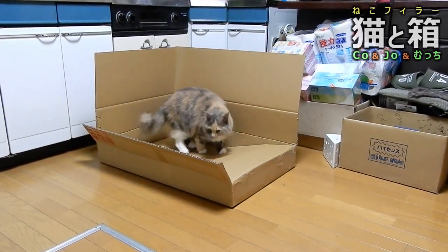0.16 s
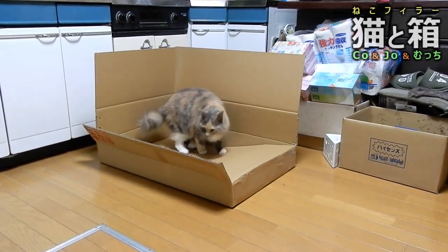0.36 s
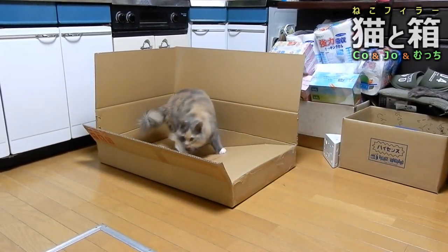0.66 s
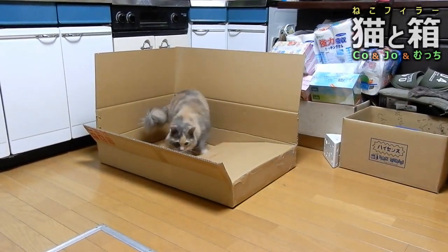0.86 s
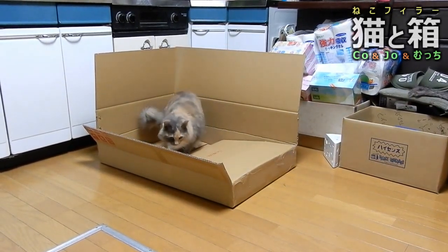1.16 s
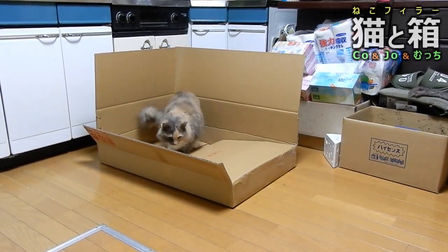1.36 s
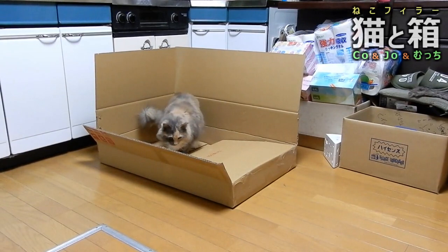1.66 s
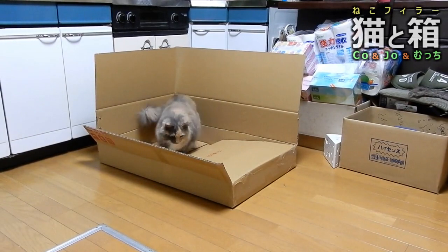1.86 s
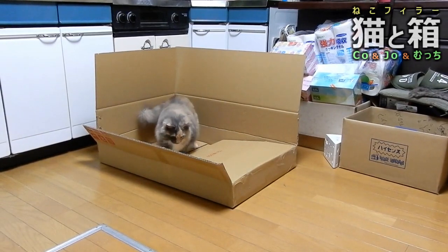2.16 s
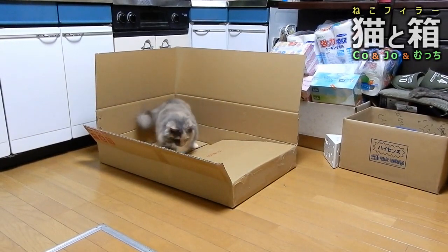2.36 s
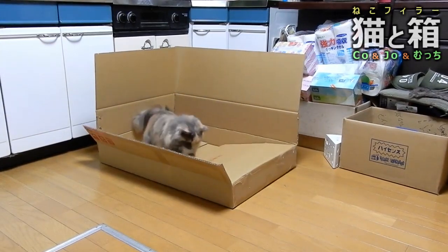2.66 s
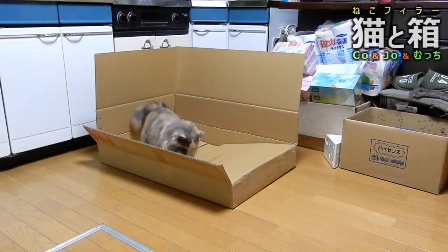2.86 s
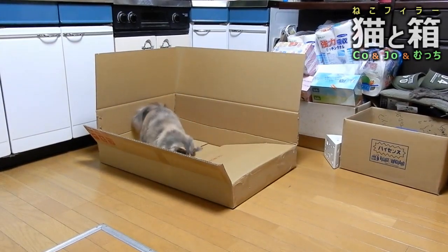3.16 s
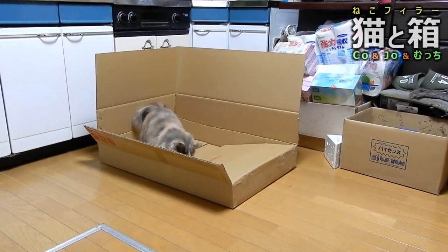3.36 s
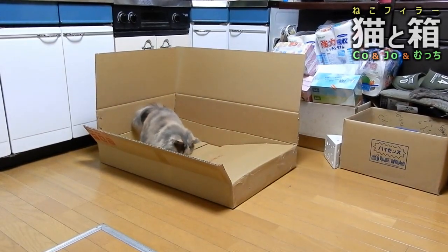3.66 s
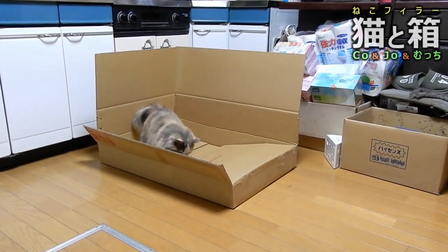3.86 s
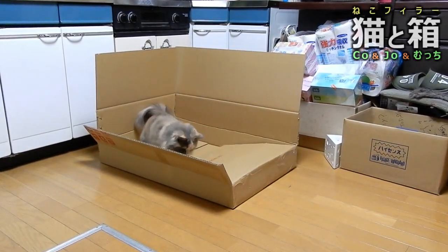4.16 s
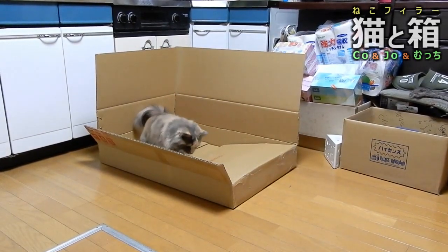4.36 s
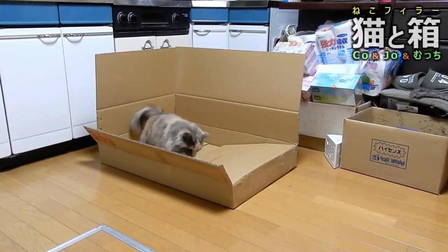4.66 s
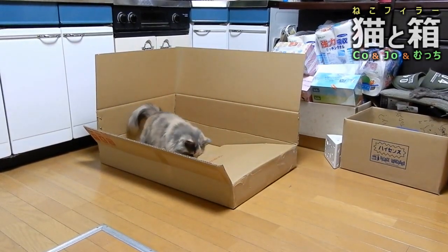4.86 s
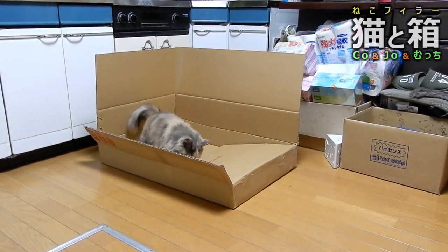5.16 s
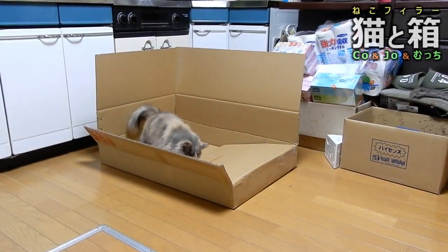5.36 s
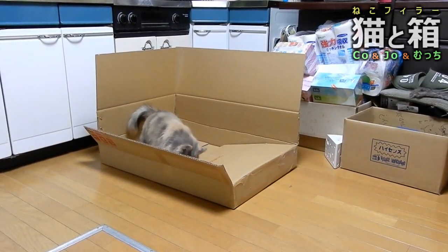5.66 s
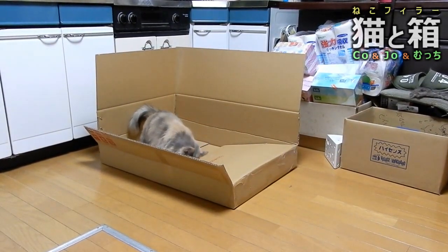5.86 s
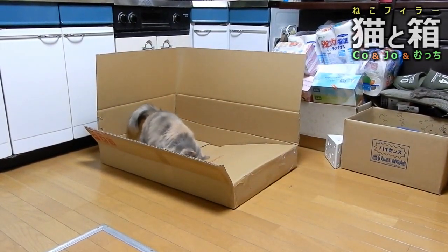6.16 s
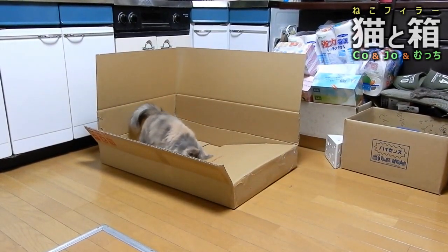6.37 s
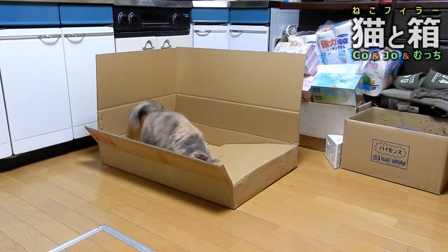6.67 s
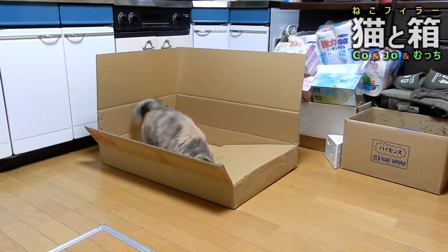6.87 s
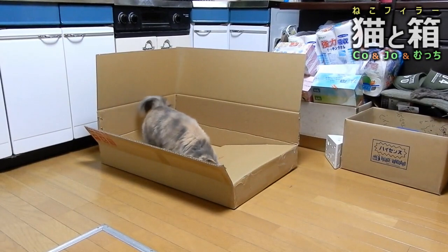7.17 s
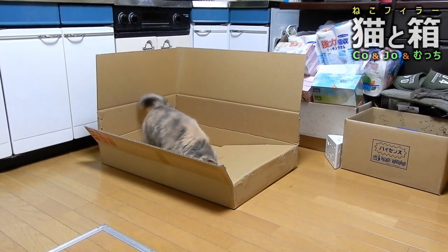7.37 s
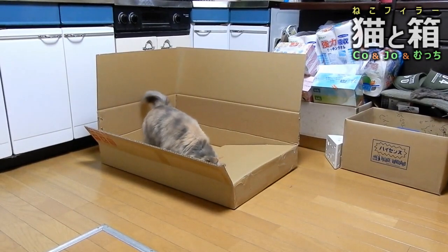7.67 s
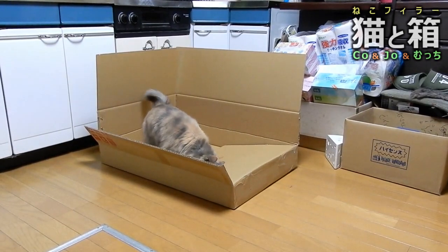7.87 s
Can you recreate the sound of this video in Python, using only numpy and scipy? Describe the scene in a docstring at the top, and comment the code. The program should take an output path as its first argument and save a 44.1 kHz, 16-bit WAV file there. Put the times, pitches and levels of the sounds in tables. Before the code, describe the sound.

A cat paws and claws at a big open cardboard box, with hollow thuds, crackly scrapes and knocks over steady kitchen appliance hum.

```python
"""Kitchen floor, a stereo camera microphone a couple of metres from a cat in an open cardboard box.
From the start, appliances hum and hiss: shaped noise with narrow whirs. Near 1 s come faint rubs and high pings.
From about 2.5 s to the end at 8 s, blows boom in panel modes and crackle as noise through card resonances.
Paws and claws rub the card as uneven slips; between 2.6 and 5 s the cat's weight thumps decaying floor modes.
A small hard room answers the box with a noise tail."""
import sys
import numpy as np
from scipy import signal
from scipy.fft import rfft, irfft, next_fast_len
from scipy.io import wavfile
from scipy.ndimage import uniform_filter1d

SR = 44100
rng = np.random.default_rng(int(sys.argv[2]) if len(sys.argv) > 2 else 0)


def master(y):
    """Save y as 16-bit WAV."""
    cut = np.clip(np.atleast_2d(y).T, -1, 1)
    pcm = np.round(cut * 32767)  # scale
    wavfile.write(sys.argv[1], SR, pcm.astype(np.int16))


N = 353241  # length in samples
LN_60_DB = np.log(1000)  # a 60 dB decay as a natural logarithm
LEFT_RIGHT = np.array([[1], [-1]])  # sign of the side signal in each channel


def undb(db):
    """Decibels to gain."""
    return 10 ** (np.asarray(db) / 20)


def level(x, db):
    """Set the rms level."""
    return x * undb(db) / np.sqrt(np.mean(x ** 2))


def at(table, hz):
    """Read a (freq_hz, value) table on a log frequency axis."""
    table = np.array(table, float)
    return np.interp(np.log(np.maximum(hz, 1)), np.log(table[:, 0]), table[:, 1])


def colour(x, table):
    """Filter by a (freq_hz, level_db) table."""
    n = next_fast_len(x.shape[-1])
    hz = np.arange(n // 2 + 1) * SR / n
    return irfft(rfft(x, n) * undb(at(table, hz)), n)[..., :x.shape[-1]]


def octave(x, hz):
    """Band-pass the octave above hz, stopping at 20 kHz."""
    sos = signal.butter(2, [hz, min(2 * hz, 20000)], "band", fs=SR, output="sos")
    return signal.sosfilt(sos, x)


def band(x, hz, width):
    """Two-pole resonance with gain 1 at its centre."""
    return signal.lfilter(*signal.iirpeak(hz, hz / width, fs=SR), x)


def walk(rate):
    """Random levels held 1 / rate s and slewed twice; spread 1."""
    hold = int(SR / rate)
    steps = np.repeat(rng.standard_normal(N // hold + 1), hold)
    smooth = uniform_filter1d(uniform_filter1d(steps, hold), hold)[:N]
    return smooth / smooth.std()


def grit(count, spread_db):
    """Dense slips of uneven but bounded size; rms 1."""
    size_db = spread_db * np.minimum(rng.exponential(size=count), 4)
    return level(rng.standard_normal(count) * undb(size_db), 0)


def add(out, s, x):
    """Mix x into out at time s."""
    i = int(s * SR)
    out[i:i + len(x)] += x[:len(out) - i]


# spectrum of the appliance hum and hiss, scaled as a whole by HUM_DB: freq_hz, level_db (relative, per Hz)
HUM_SPECTRUM = [(12, -60), (20, -6.5), (87, 0), (109, 1), (324, 5), (416, -2), (478, 2), (581, -7),
                (746, -5), (1300, -13), (1450, -14.5), (1580, -12.5), (3850, -21.5), (6540, -28.5),
                (15500, -35.5)]
# stereo width of the hum: freq_hz, side_minus_mid_db
HUM_WIDTH = [(60, -23), (110, -3), (200, -9), (380, -10), (700, -5.5), (1290, -12), (2380, -6.5),
             (4400, -3), (8120, 1), (15000, -2)]
# narrow whirs of fans and compressor: freq_hz, width_hz, level_db (rms)
APPLIANCE_WHIRS = [(767, 5.9, -66.5), (1473, 18, -68.5), (1996, 31, -72.5), (3710, 280, -71),
                   (4700, 270, -77), (6060, 110, -81.5)]
HUM_DB = -51.5  # rms of the mid signal


def kitchen():
    """Broad hum and hiss whose octaves flicker slightly, with narrow bands of noise whirring on top."""
    noise = np.zeros((2, N))
    for hz in 20 * 2 ** np.arange(10.):
        flicker = undb(.6 * walk(6))
        noise += flicker * octave(rng.standard_normal((2, N)), hz)
    mid, side = colour(noise, HUM_SPECTRUM)
    side = colour(side, HUM_WIDTH)
    scale = undb(HUM_DB) / mid.std()
    whirs = sum(level(band(rng.standard_normal(N), hz, width), db) for hz, width, db in APPLIANCE_WHIRS)
    return scale * (mid + LEFT_RIGHT * side) + whirs


# decay time of the small hard room: freq_hz, t60_s
ROOM_DECAY = [(150, 0.24), (600, 0.2), (2500, 0.26), (6000, 0.3), (12000, 0.15)]
# tail's side-to-mid level before ROOM_DB lowers the mid, set by hand: freq_hz, side_minus_mid_db
TAIL_SIDE = [(30, -5), (100, -24), (300, -29.5), (1000, -19.5), (2500, -55), (5000, -25.5), (9000, -6.5),
             (13000, -2)]
ROOM_DB, LEFT_DB = -5, -.3  # gain of the mid tail; left channel relative to right


def room(x):
    """Nearly mono direct sound plus a dense tail decaying by octave, with a weak side tail."""
    hop, t = SR // 10, np.arange(SR // 3) / SR
    edges = 45 * 2 ** np.arange(9.)
    noise = np.array([octave(rng.standard_normal((2, 2 * SR)), hz) for hz in edges])
    t60 = at(ROOM_DECAY, edges * np.sqrt(2))[:, None, None]
    unit_energy = np.sqrt(2 * LN_60_DB / t60 / SR)
    decay = np.exp(-LN_60_DB * t / t60) * unit_energy * (t > .003)
    window = np.sin(np.pi * np.arange(2 * hop) / (2 * hop))
    wet = np.zeros((2, N + SR))
    # a fresh random tail every 0.1 s, cross-faded, keeps the echo smooth and uncoloured
    for i in range(0, N, hop):
        j = rng.integers(SR)
        tail = (noise[:, :, j:j + len(t)] * decay).sum(axis=0)
        piece = x[i:i + 2 * hop]
        echo = signal.fftconvolve((window[:len(piece)] * piece)[None], tail, axes=1)
        wet[:, i:i + echo.shape[1]] += echo
    mid = x + undb(ROOM_DB) * wet[0, :N]
    side = colour(wet[1, :N], TAIL_SIDE)
    return undb(LEFT_RIGHT * LEFT_DB / 2) * (mid + LEFT_RIGHT * side)


# the cat's weight presses the box onto the floorboards: start_s, level_db (scales the board modes)
FLOOR_THUMPS = [(2.651, -21.5), (2.718, -30), (2.792, -34), (4.343, -27), (4.928, -23.5)]
# floorboard modes: freq_hz, level_db (relative), t60_s
FLOORBOARD_MODES = [(63.4, -20.5, 0.78), (106.5, -1, 0.13)]


def thumps():
    """A soft push sets the floorboards booming as decaying sines."""
    out, t = np.zeros(N), np.arange(SR // 2) / SR
    boom = sum(undb(db) * np.sin(2 * np.pi * hz * t) * np.exp(-LN_60_DB * t / t60)
               for hz, db, t60 in FLOORBOARD_MODES)
    soft_rise = 1 - np.exp(-t / 0.0018)
    for s, db in FLOOR_THUMPS:
        add(out, s, undb(db) * boom * soft_rise)
    return out


# runs of faint pings, each ping scattered in size and pitch: start_s, length_s, level_db, pitch_hz
PING_RUNS = [(1.135, .09, -63, 4970), (1.882, 0.058, -50, 6530), (2.034, 0.04, -44, 6470),
             (2.164, 0.039, -53, 6740), (2.221, 0.032, -48, 6700), (2.302, 0.077, -57, 6830),
             (2.41, .025, -47.5, 6670), (2.761, .25, -32, 6520), (3.075, 0.36, -40.5, 7820),
             (4.7446, 0.0044, -32, 7700), (4.786, 0, -34, 7850), (6.01, 0.046, -39.5, 1993),
             (6.56, 0.025, -43.5, 2386), (7.152, .035, -43, 5100), (7.151, 0.0027, -39, 2420),
             (7.16, .04, -44, 3140)]
TICK_GAP_S, TICK_SCATTER_DB, TICK_DETUNE = .017, 3, .012  # median gap; spreads of size and pitch (a fraction)
TICK_OVERTONE, TICK_OVERTONE_DB = 1.19, -11.5  # pitch ratio and level against the main tone
TICK_CYCLES = 14.7  # cycles for the ring to fall to 1/e


def ticks():
    """Short pings with one overtone at uneven gaps, each a little off in size and pitch."""
    out, t = np.zeros(N), np.arange(SR // 20) / SR
    for s, length, db, hz in PING_RUNS:
        after = 0
        ring = (1 - np.exp(-t / 0.00039)) * np.exp(-t * hz / TICK_CYCLES)
        for gap, size, pitch in rng.standard_normal((24, 3)):
            if after <= length:
                phase = 2 * np.pi * hz * (1 + TICK_DETUNE * pitch) * t
                tone = np.sin(phase) + undb(TICK_OVERTONE_DB) * np.sin(TICK_OVERTONE * phase)
                add(out, s + after, undb(db + TICK_SCATTER_DB * size) * tone * ring)
            after += TICK_GAP_S * np.exp(0.3 * gap)
    return out


# modes of the box panels: freq_hz, level_db (relative), t60_s
PANEL_MODES = [(109, -14, 0.088), (155.1, -5.5, 0.12), (194.3, -3.5, 0.063), (267.8, 2, 0.12),
               (351.8, 1, 0.13), (423.6, -5, 0.065), (530.1, -6.5, 0.047), (562.6, -4, 0.052),
               (583, -5, 0.042), (750, -13, 0.021), (862, -12, 0.022), (1037, -13.5, 0.012),
               (1217, -21, 0.0096)]


def panels(x, weight_db, knock_db, chance_db):
    """Panel modes ring from a force; body weight tilts them to the lowest, claws knock those near 590 Hz."""
    hz, db, t60 = np.transpose(PANEL_MODES)
    low = np.maximum(np.log2(350 / hz), -1)
    knock = np.abs(hz - 590) < 60
    gain = undb(db + weight_db * low + knock_db * knock + chance_db)
    width = LN_60_DB / np.pi / t60
    y = sum((-1) ** k * gain[k] * band(x, hz[k], width[k]) for k in range(len(hz)))
    return y / np.sqrt(np.sum(gain ** 2 * width * np.pi / SR))


def bands(x, table, tilt_db, chance_db=0, wander_db=0):
    """Resonances applied twice, tilted per octave, optionally swelling; about unit power for unit noise."""
    hz, width, db = np.transpose(table)
    gain = undb(db + tilt_db * np.log2(hz / hz[0]) + chance_db)
    y = 0
    for k in range(len(hz)):
        swell = undb(wander_db * walk(12)) if wander_db else 1
        ring = band(band(x, hz[k], width[k]), hz[k], width[k])
        y = y + (-1) ** k * gain[k] * swell * ring
    return y / np.sqrt(np.sum(gain ** 2 * width * np.pi / 2 / SR))


# crackle resonances of the corrugated card: freq_hz, width_hz, level_db (relative)
CARD_BANDS = [(1928, 490, 2), (2430, 710, 4.5), (2766, 1100, 3), (3490, 490, 0.5), (3770, 640, 0),
              (4780, 1840, -4.5)]


def card(x, tilt_db, chance_db=0, wander_db=0):
    """Slips crackle through the resonances of the corrugated card."""
    return bands(x, CARD_BANDS, tilt_db, chance_db, wander_db)


# fizz resonances of fibres and fur: freq_hz, width_hz, level_db (relative)
FIBRE_BANDS = [(6500, 2350, 4.5), (7770, 1960, 6), (9490, 2900, -2.5), (13200, 3600, -16.5)]


def fibres(x, tilt_db, wander_db=0):
    """Slips fizz through the high resonances of fibres and fur."""
    return bands(x, FIBRE_BANDS, tilt_db, wander_db=wander_db)


STROKE_ATTACK_S, STROKE_RELEASE_DB_PER_S = 0.03, -450


def stroke(t, length, slope_db):
    """Pressure of one stroke: it digs in, presses harder or eases off, then lets go."""
    fade_db = slope_db * np.clip(t, 0, length) + STROKE_RELEASE_DB_PER_S * np.maximum(t - length, 0)
    return np.clip(t / STROKE_ATTACK_S, 0, 1) * undb(fade_db)


# strokes of paws and claws over the card, levels before the pressure slope and uneven slips:
# start_s, length_s, boom_db, crackle_db, fizz_db, pressure_slope_db_per_s
PAW_STROKES = [(0.913, 0.48, -54, -70, -66.5, -25), (1.88, 0.69, -72, -76, -73.5, -5),
               (2.515, 0.12, -70, -62.5, -63.5, 8), (2.673, 0.22, -39, -45.5, -43.5, -16),
               (2.945, 0.12, -41, -48, -50, -2), (3.076, 0.34, -33.5, -45.5, -46, -10),
               (3.45, 0.15, -48, -59, -55.5, -44), (3.662, 0.048, -57, -64, -60.5, 52),
               (4.233, 0.044, -50, -58, -56.5, -2), (4.31, 0.043, -29.5, -35, -37, 0),
               (4.336, 0.093, -25.5, -33, -33.5, -100), (4.455, 0.17, -47, -62, -62.5, -44),
               (4.607, 0.063, -42, -55.5, -58, 85), (5.136, 0.048, -28, -36.5, -40, -30),
               (5.199, 0.16, -37, -45.5, -47.5, 0), (5.45, 0.048, -42, -58, -60.5, 98),
               (5.82, 0.17, -41, -69, -55, -42), (6.125, 1.35, -60.5, -71.5, -71.5, 5.5),
               (7.056, 0.088, -54, -67, -64, 30), (7.222, 0.061, -50, -56.5, -60.5, 20),
               (7.367, 0.09, -50, -65, -77, -3), (7.809, 0.017, -27, -49, -48, 0)]


def rubs():
    """Stick-slip of pads and claws drives panels, card and fibres, never evenly."""
    t = np.arange(N) / SR
    pressures = np.zeros((3, N))
    for s, length, *levels_db, slope in PAW_STROKES:
        pressures += undb(levels_db)[:, None] * stroke(t - s, length, slope)
    boom, crackle, fizz = pressures
    slips = undb(1.6 * walk(120)) * grit(count=N, spread_db=1.5)
    # the panels are driven by a separate, unevenly swelling noise
    drag = undb(2.8 * walk(110)) * rng.standard_normal(N)
    booming = panels(boom * drag, weight_db=-2.5, knock_db=5.5, chance_db=0)
    crackling = card(crackle * slips, tilt_db=4.0, wander_db=2.0)
    fizzing = fibres(fizz * slips, tilt_db=3.5, wander_db=1.5)
    return booming + crackling + fizzing


# paw blows; weight tilts towards the lowest modes, length is that of the shudder:
# start_s, boom_db (short-term rms peak), crackle_db, fizz_db, length_s, weight_db_per_octave, rise_s
PAW_BLOWS = [(0.929, -70, -62, -51, 0.008, 0, .001), (2.649, -22.5, -20.5, -26, 0.04, 6, .005),
             (2.785, -34, -53, -35, 0.018, -3, .006), (2.975, -34.5, -30, -33.5, 0.032, -4.5, 0.011),
             (3.103, -38.5, -48, -32, 0.006, -12, 0.00069), (3.502, -39, -34.5, -65, 0.012, 1, 0.0075),
             (3.704, -16.5, -12.5, -24, 0.026, -0.5, 0.0025), (4.640, -32.5, -54, -47, 0.021, 10, 0.0035),
             (4.663, -30.5, -36, -44, 0.026, -3.5, 0.0022), (4.74, -50.5, -41.5, -39.5, 0.064, -46, 0.0034),
             (4.925, -19, -28, -32.5, 0.026, 2, .002), (5.532, -16.5, -13.5, -23.5, 0.023, 1.3, 0.002),
             (5.736, -39.5, -43.5, -52, 0.02, 2, 0.0031), (5.807, -29, -29.5, -32.5, 0.041, -2, 0.0051),
             (5.938, -39, -41.5, -66, 0.027, 3, 0.0074), (6.000, -29, -36.5, -41, 0.026, 3, 0.0037),
             (6.228, -14, -10, -27.5, 0.018, -0.4, 0.0025), (6.548, -46, -48, -51, 0.044, -6, 0.0027),
             (7.099, -44.5, -43, -58, 0.014, -17, .004), (7.148, -56, -32.5, -37, 0.014, 4, .002),
             (7.560, -17, -11.5, -20.5, 0.024, -0.4, 0.0024), (7.71, -34.5, -42, -41, 0.04, 1.5, 0.0051),
             (7.834, -12.5, -19, -20.5, 0.025, -0.4, 0.0024)]
BOOM_LAG_S = 0.003  # added to the rise time of the boom


def blows():
    """Each blow cracks at once, then the loose panels shudder and boom a little later."""
    out, t = np.zeros(N), np.arange(SR // 3) / SR
    for s, boom_db, crackle_db, fizz_db, length, weight_db, rise in PAW_BLOWS:
        push = (1 - np.exp(-t / (rise + BOOM_LAG_S))) * np.exp(-(t / length) ** 2)
        crack = (1 - np.exp(-t / rise)) * (.5 * np.exp(-t / 0.0022) + 0.52 * np.exp(-t / length))
        # the card gives way in a few separate bursts
        steps = np.repeat(rng.standard_normal(len(t) // 100), 100)
        bursts = undb(2.63 * uniform_filter1d(steps, size=60))
        slips = crack * bursts * grit(count=len(t), spread_db=1.5)
        # little fizz means a soft pad, which dulls the whole crackle; each spot rings its own way
        dull_db = 0.32 * (fizz_db - crackle_db + 8.0)
        spot_db = 1.16 * rng.standard_normal(len(CARD_BANDS))
        # light blows land claw first and knock; heavy ones land flat and boom
        knock_db = -.22 * (boom_db - 6.5)
        mode_chance_db = 0.49 * rng.standard_normal(len(PANEL_MODES))
        boom = panels(push * rng.standard_normal(len(t)), weight_db, knock_db, mode_chance_db)
        boom *= undb(boom_db) / np.sqrt(uniform_filter1d(boom ** 2, size=900).max())
        crackle = undb(crackle_db) * card(slips, dull_db, spot_db)
        fizz = undb(fizz_db) * fibres(slips, dull_db)
        add(out, s, boom + crackle + fizz)
    return out


def scene():
    """Box sounds in the room over the kitchen hum."""
    return kitchen() + room(thumps() + ticks() + rubs() + blows())


def record(dry):
    """The camera cuts the top with a steep low-pass at 15.8 kHz."""
    return signal.sosfilt(signal.ellip(10, .2, 80, 15800, fs=SR, output="sos"), dry)


dry = scene()
out = record(dry)
master(out)
```